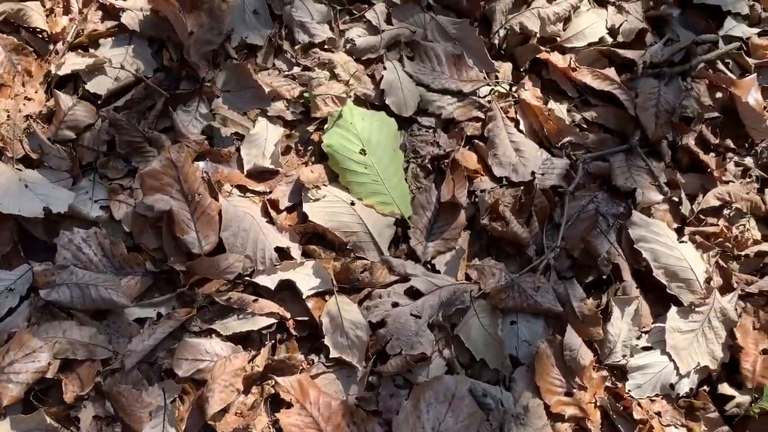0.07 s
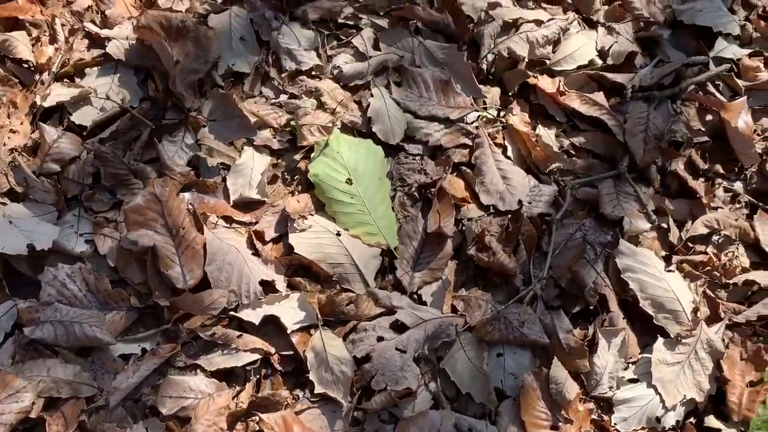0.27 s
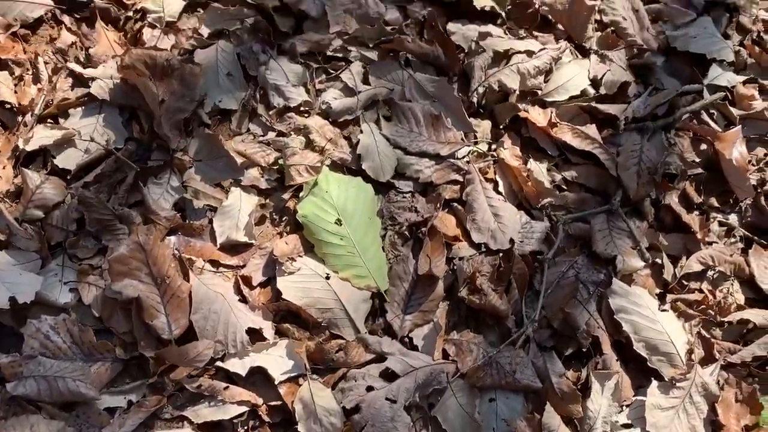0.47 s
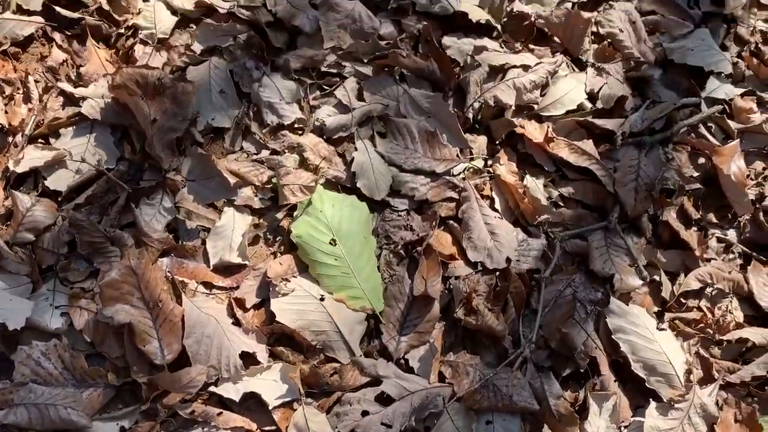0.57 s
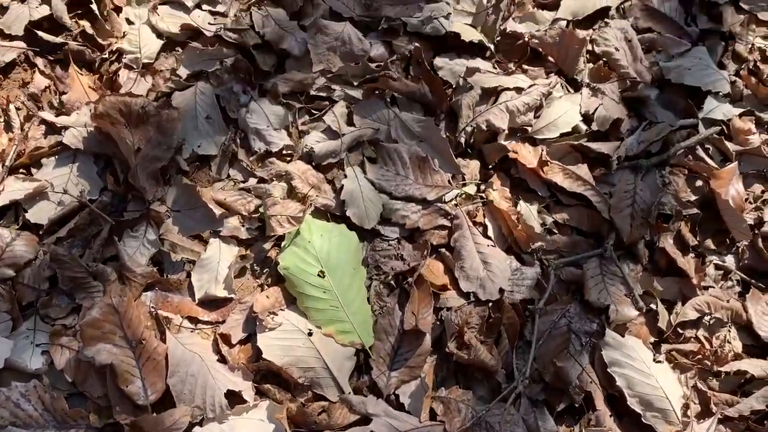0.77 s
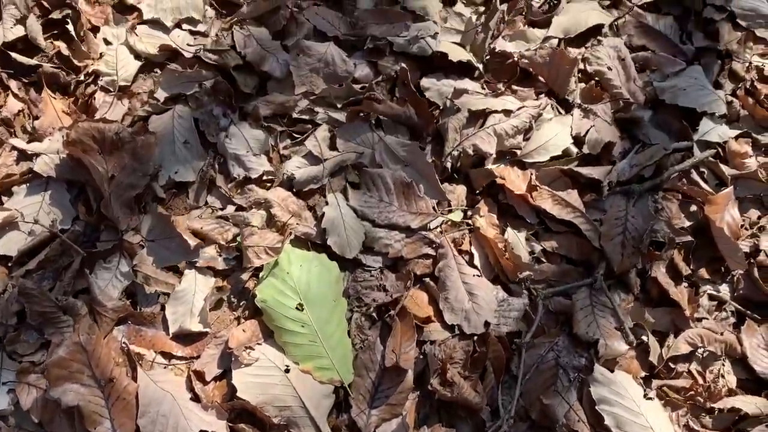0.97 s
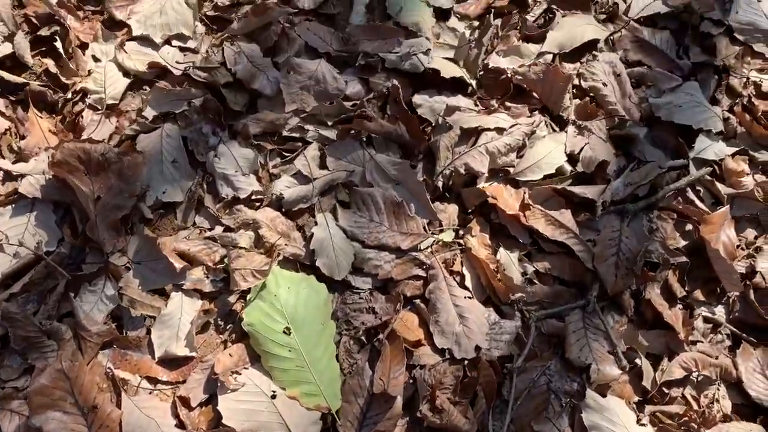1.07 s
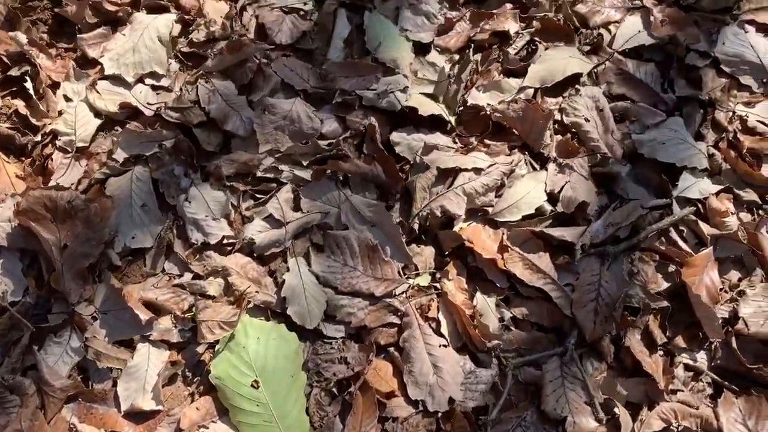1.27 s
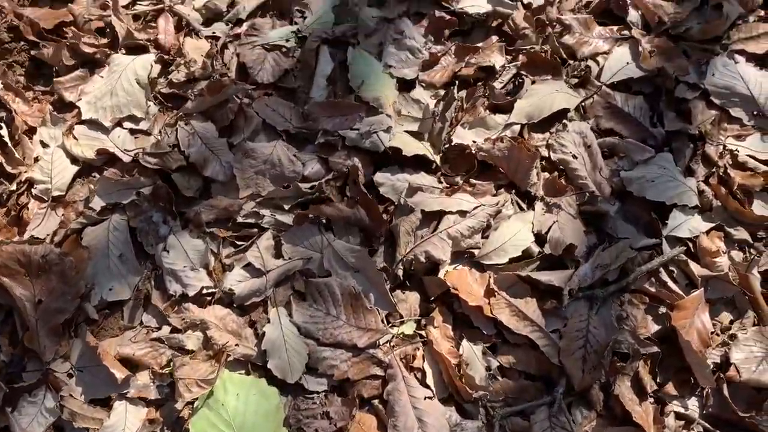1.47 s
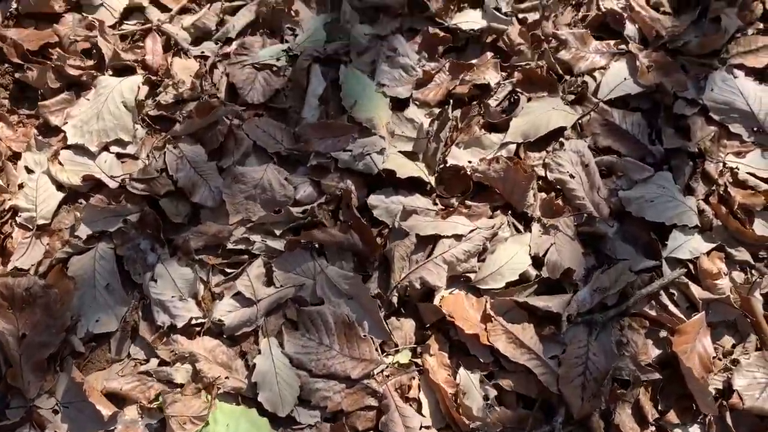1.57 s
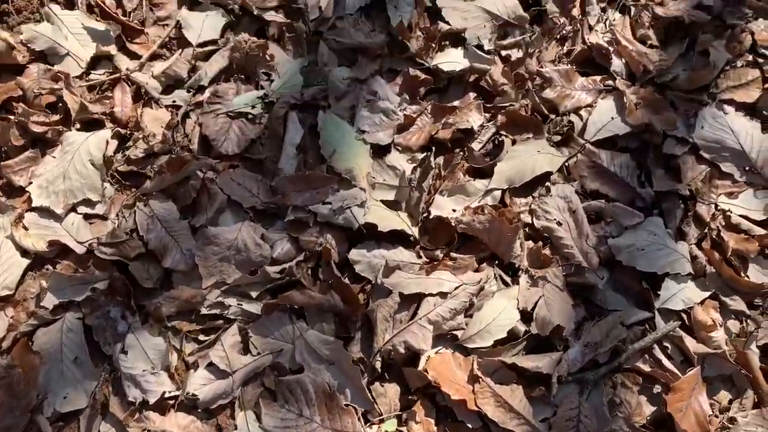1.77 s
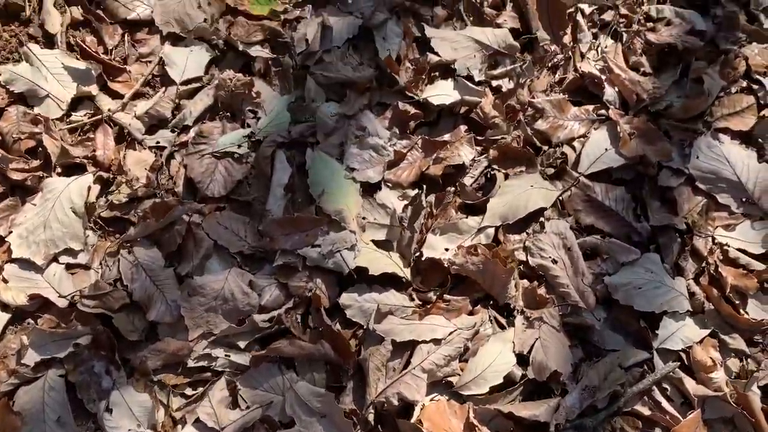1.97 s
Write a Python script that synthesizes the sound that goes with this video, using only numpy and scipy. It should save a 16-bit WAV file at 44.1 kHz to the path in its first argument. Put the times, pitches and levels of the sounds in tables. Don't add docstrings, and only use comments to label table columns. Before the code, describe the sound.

Footsteps in deep dry leaves. A foot settles softly, then shuffles and crushes from 0.15 to 0.6 seconds, peaking near 0.3. After a lull around 0.7, a firm step crunches at 0.8-0.95 and drags into a thin rustle. The heaviest crush comes at 1.3-1.5, fading with ticks; another step builds from 1.8 and is crunching at 2.0. Twigs snap throughout over faint low outdoor rumble.

```python
import sys
import numpy as np
from scipy import signal
from scipy.fft import rfft, irfft
from scipy.io import wavfile
from scipy.ndimage import uniform_filter1d

SR = 44100
rng = np.random.default_rng(int(sys.argv[2]) if len(sys.argv) > 2 else 0)


def to_wav(s):
    ch = np.atleast_2d(s).T
    pcm = np.round(np.clip(ch, -1, 1) * 32767)
    wavfile.write(sys.argv[1], SR, pcm.astype(np.int16))


def to_linear_factor(level_db):
    exponent = np.asarray(level_db, float) / 20
    return 10 ** exponent


N = 88420


def evened(x):
    return x / np.sqrt(np.mean(x ** 2) + 1e-20)


def read(points, hz):
    f, value = np.transpose(points)
    return np.interp(np.log(hz + 1), np.log(f + 1), value)


def high_pass(x, hz):
    return signal.sosfilt(signal.butter(2, hz, "high", fs=SR, output="sos"), x)


# start in seconds,
# pressure on the leaves in dB, weight in the litter in dB, depth of the sole in dB.
STRIDES = [
    [(0, -33, 0, 3), (.045, -39, -6.5, 7), (.134, -43, -0.5, 4.5)],
    [(.138, -34.5, -2, 5), (.2, -32, 0, 0), (.28, -24.5, 1, -15), (.35, -41, 0.5, -6.5), (.39, -40, 0, 1),
     (.455, -35.5, 5, -14), (.545, -35.5, -1.5, -3), (.572, -44.5, 0.5, 0), (.62, -47, -4.5, -3)],
    [(.665, -43, 3.5, -12), (.7, -50.5, -5.5, -7), (.766, -54, 2, -5)],
    [(.77, -37.5, 0, -10), (.797, -26.5, -3.5, -2), (.905, -27, 1.5, -2), (.93, -28.5, -1, -1),
     (.957, -39.5, -7.5, -5), (1.0, -38.5, -1, 1), (1.11, -38, 4, -28), (1.19, -47, 0.5, 4.5),
     (1.277, -55, -3, 4)],
    [(1.28, -33.5, -16, -2), (1.3, -36, 7, 4), (1.355, -24, 0.5, 4.5), (1.39, -26.5, 1, 3),
     (1.455, -22, -1, 2), (1.51, -28.5, -4, -2.5), (1.535, -41, 2, 3.5), (1.65, -43, 0.5, 5),
     (1.658, -33.5, -1, -1.5)],
    [(1.8, -34, -6, -2), (1.85, -37, -2, 6), (1.9, -33.5, -5.5, 3), (1.94, -24.5, -5, 5),
     (2.005, -26, -2, 4.5)],
]
PRESSURE, WEIGHT, DEPTH = 1, 2, 3


def control(column):
    rows = np.concatenate(STRIDES)
    return np.interp(np.arange(N) / SR, rows[:, 0], rows[:, column])


# pitch in Hz, level in dB per Hz.
RUMBLE_COLOUR = [(22, -12), (35, -16), (55, 4), (80, 0), (150, -10.5), (400, -17), (1700, -21),
                 (15000, -35)]


def rumble():
    level_db, sway_share = -61.5, 0.33
    hz = np.fft.rfftfreq(N, 1 / SR)
    spectrum = rfft(rng.standard_normal((2, N))) * to_linear_factor(read(RUMBLE_COLOUR, hz)) * (hz > 20)
    sway = uniform_filter1d(control(PRESSURE), size=2000)
    return to_linear_factor(level_db + sway_share * (sway - sway.mean())) * evened(irfft(spectrum, N))


def ground(x):
    level_db, t60_s, rise_s = -11.5, 0.04, 0.001
    t = np.arange(4000) / SR
    dull_noise = uniform_filter1d(rng.standard_normal((2, 4000)), size=2)
    tail = dull_noise * to_linear_factor(-60 * t / t60_s) * np.minimum(t / rise_s, 1)
    return x + to_linear_factor(level_db) * signal.oaconvolve(x, tail / np.linalg.norm(tail[0]), axes=1)[:, :N]


def grain(hz, turns, twist):
    u = np.arange(int(8 * SR / hz * 4) + 8) * hz / SR / max(turns, .3)
    phase = 2 * np.pi * (u * turns + twist) + np.array([[0], [np.pi / 2]])
    ring = u * np.exp(-3.0 * u) * np.cos(phase)
    return ring / np.linalg.norm(ring[0])


def splits(events):
    rise_s, fall_s, length = .0006, .001, 700
    ring_turns, edge_turns = 3, 1.02
    white_share = 0.65
    t = np.arange(length) / SR
    shape = (1 - np.exp(-t / rise_s)) * np.exp(-t / fall_s)
    out = np.zeros((2, N + length))
    for start_s, ring_db, ring_hz, edge_db, edge_hz in events:
        tear = rng.standard_normal((2, length)) * shape
        ring = signal.oaconvolve(tear, grain(ring_hz, ring_turns, 0), axes=1)[:, :length]
        edge = signal.oaconvolve(tear, grain(edge_hz, edge_turns, 0), axes=1)[:, :length]
        edge = edge + white_share * tear
        both = to_linear_factor(ring_db) * ring / abs(ring).max() + to_linear_factor(edge_db) * edge / abs(edge).max()
        i = round(start_s * SR)
        out[:, i:i + length] += both
    return high_pass(out[:, :N], 350)


# start in seconds, peak in dB, pitch in Hz.
TICKS = [(0.135, -28, 6300), (.212, -20, 6100), (.245, -32, 6000), (.274, -12.5, 7100), (.3015, -20, 6000),
         (0.332, -19, 5070), (0.356, -21, 7100), (0.3635, -22, 5600), (.3764, -31, 7040), (.405, -11, 7000),
         (.4104, -21.5, 6600), (0.4255, -22, 9200), (.4594, -19, 8200), (0.53, -21, 7000),
         (0.55, -23, 5900), (.5734, -29, 7800), (0.5872, -30, 9800), (.6095, -33, 9000),
         (.6145, -26.5, 5900), (.6265, -26, 9000), (0.637, -30, 9000), (0.6396, -33.5, 11200),
         (.6534, -31.5, 7900), (0.658, -28, 8600), (0.6898, -37, 8850), (.697, -39, 9000),
         (0.7158, -33, 7000), (0.7626, -36, 6500), (0.7703, -29, 8000), (0.7816, -34, 6700),
         (.7906, -31, 7260), (0.8556, -16, 6200), (.909, -13, 7200), (0.9119, -15, 7250),
         (.9214, -19, 9000), (0.9265, -16.5, 10000), (0.944, -24, 7900), (.9812, -26.5, 5500),
         (0.9947, -23, 6460), (.9984, -29, 7860), (1.185, -31.5, 6000), (1.279, -24.5, 7000),
         (1.33, -21, 6000), (1.352, -15, 6900), (1.45, -15, 8200), (1.459, -8, 9800), (1.6077, -23.5, 9000),
         (1.6099, -16, 11000), (1.627, -26, 8000), (1.6538, -25.5, 7050), (1.756, -26, 5000),
         (1.864, -17.5, 3800), (1.909, -23, 6500), (1.93, -16.5, 6100), (1.95, -14.5, 6440),
         (1.973, -11.5, 6780)]


def ticks():
    return splits([(s, db - 22, 1900, db + 4, hz) for s, db, hz in TICKS])


# start in seconds, peak in dB, ring in Hz, crisp edge over the peak in dB.
SNAPS = [(0.034, -22, 2220, -7.5), (0.04, -36, 402, -7), (0.137, -18.5, 1370, 0), (0.331, -21.5, 1940, 2),
         (0.362, -26, 1630, -8), (0.446, -18.5, 1460, 3), (0.472, -20, 1860, 2), (0.552, -17.5, 1510, -1),
         (0.555, -23.5, 930, -16), (0.585, -32, 1090, -10), (0.689, -38, 1700, -12),
         (0.91, -15.5, 1830, -15), (1.187, -37, 1660, 3), (1.233, -35.5, 1900, 0), (1.475, -15, 1980, -1),
         (1.555, -27, 1760, -1), (1.626, -28, 2020, -11), (1.754, -39, 1870, -6), (1.866, -22, 1610, -5),
         (1.931, -22, 850, -3), (1.957, -13, 1900, -8), (1.979, -19, 1390, -5)]


def snaps():
    return splits([(s, db - 1, hz, db + edge_db, 8500) for s, db, hz, edge_db in SNAPS])


def cracks(colour, per_s, spread_db, turns, drive, count=28):
    chance, size, pick, sign = rng.random((4, N))
    train = drive * to_linear_factor(-spread_db * np.log(size + 0.0018)) * (chance < per_s / SR)
    signs = np.array([np.ones(N), np.sign(sign - .5)])
    out = np.zeros((2, N))
    for k, hz in enumerate(np.geomspace(colour[0][0], colour[-1][0], count)):
        own = train * ((pick * count).astype(int) == k) * signs
        rings = signal.oaconvolve(own, grain(hz, turns, rng.random()), axes=1)[:, :N]
        out += to_linear_factor(read(colour, hz)) * np.sqrt(hz) * rings
    return out


def bunching():
    clump_s, depth_db = .002, 1.3
    kernel = np.exp(-np.arange(900) / (clump_s * SR))
    jitter = signal.oaconvolve(rng.standard_normal(N), kernel)[:N]
    return to_linear_factor(depth_db * evened(jitter - uniform_filter1d(jitter, size=900)))


# pitch in Hz, level in dB per Hz.
CRISP = [(1500, -4.5), (2500, -8.5), (3200, -4.5), (4500, -5.5), (6000, -7), (8000, -2), (11000, -8),
         (15500, -9)]
LITTER = [(400, -33.5), (700, -34), (1000, -5.5), (1400, -5.5), (1900, -0.5), (2700, -9), (3500, -46)]
SOLE = [(120, -10), (250, -9), (450, -11), (800, 3.5), (1200, -0.5), (1600, -6.5)]


def crush():
    pressure, bunch = control(PRESSURE), bunching()
    crisp = evened(cracks(CRISP, per_s=22000, spread_db=2, turns=3.13, drive=bunch))
    middle = signal.sosfiltfilt(signal.butter(1, (4800, 6700), "band", fs=SR, output="sos"), crisp)
    crisp = crisp - np.clip(.034 * (-32 - pressure), 0, .5) * middle
    litter = evened(cracks(LITTER, per_s=3500, spread_db=2.5, turns=2.2, drive=bunch))
    sole = evened(cracks(SOLE, per_s=2700, spread_db=2.5, turns=1.87, drive=bunch, count=14))
    crisp_db = 2
    litter_db = -3.5 + control(WEIGHT)
    sole_db = -10 + control(DEPTH) + 0.11 * (pressure + 27.5)
    return to_linear_factor(pressure) * (to_linear_factor(crisp_db) * crisp + to_linear_factor(litter_db) * litter + to_linear_factor(sole_db) * sole)


def scene():
    leaves = high_pass(crush() + snaps() + ticks(), 209)
    return rumble() + ground(leaves)


# pitch in Hz, share in common from 0 to 1.
SAME = [(60, 0.92), (200, 0.83), (800, 0.92), (1700, 0.75), (3200, 0.48), (5000, 0.025), (7000, 0.45),
        (9000, 0.75)]
# pitch in Hz, left over right in dB.
LEFT = [(60, -1.5), (250, 0.2), (800, -1.5), (2400, 0), (3400, -2), (5200, -4.5), (7200, -0.7), (10000, 0)]


def top_cut(x):
    return signal.sosfilt(signal.butter(12, 17050, fs=SR, output="sos"), x)


def record(dry):
    port_lag_s, in_step_hz = .0002, 6000
    hz = np.fft.rfftfreq(N, 1 / SR)
    a, b = rfft(dry)
    same = np.clip(read(SAME, hz), 0, 1)
    lean = to_linear_factor(read(LEFT, hz) / 2)
    lag_share = np.interp(hz, [2300, 3200], [0, 1])
    lag = np.exp(2j * np.pi * port_lag_s * (hz - in_step_hz) * lag_share)
    left = a * lean
    right = (same * lag * a + np.sqrt(1 - same ** 2) * b) / lean
    return top_cut(irfft(np.array([left, right]), N))


dry = scene()
out = record(dry)
to_wav(out)
```